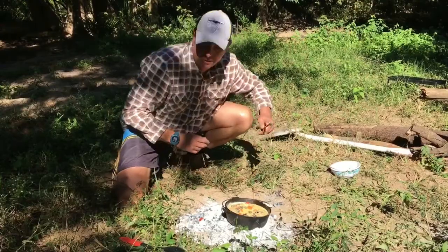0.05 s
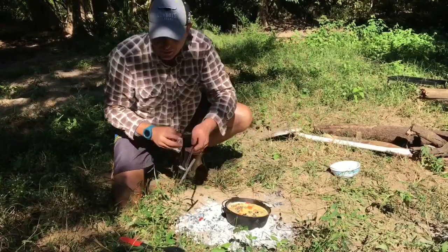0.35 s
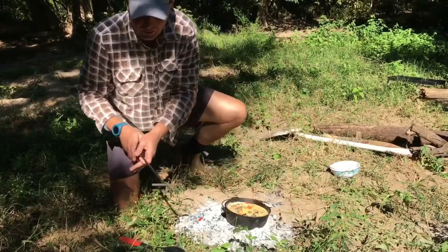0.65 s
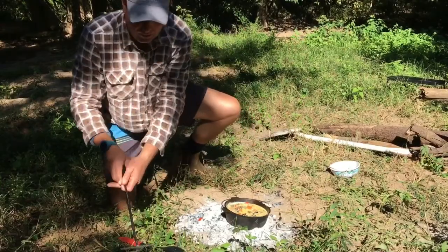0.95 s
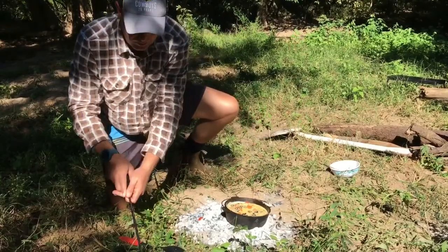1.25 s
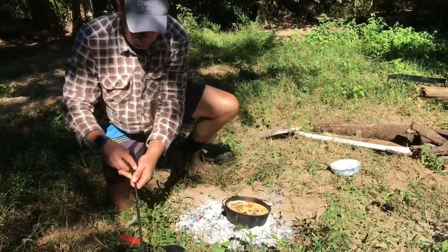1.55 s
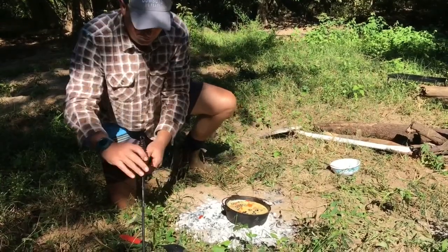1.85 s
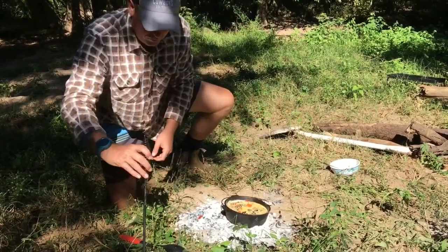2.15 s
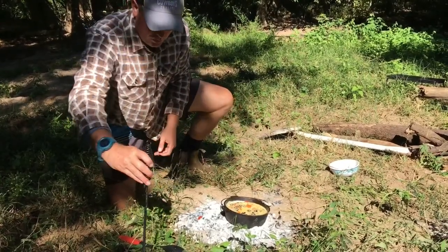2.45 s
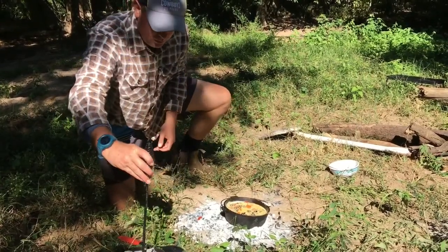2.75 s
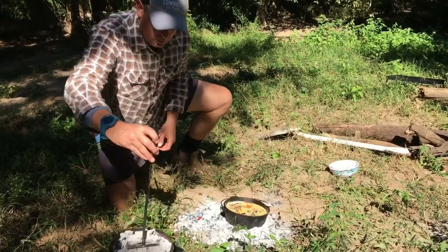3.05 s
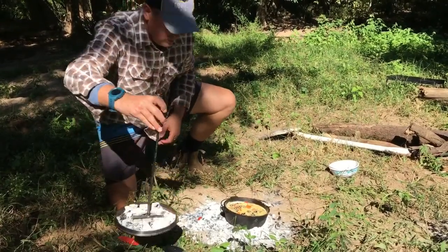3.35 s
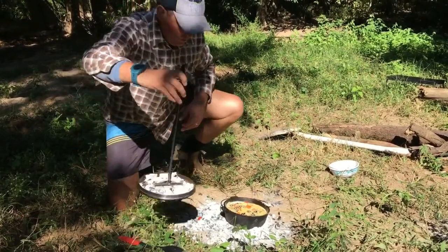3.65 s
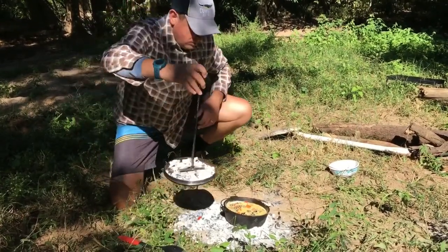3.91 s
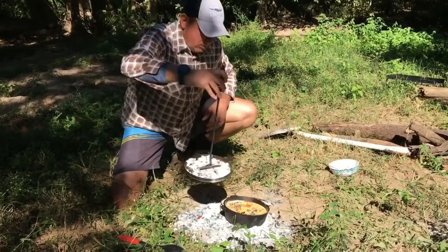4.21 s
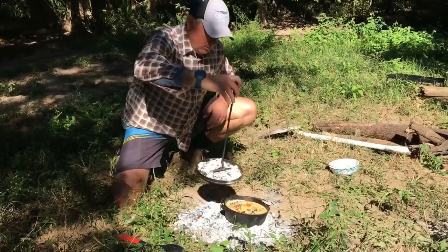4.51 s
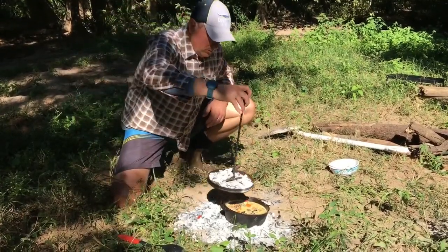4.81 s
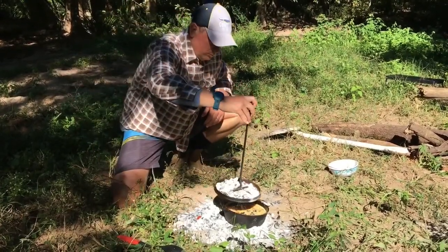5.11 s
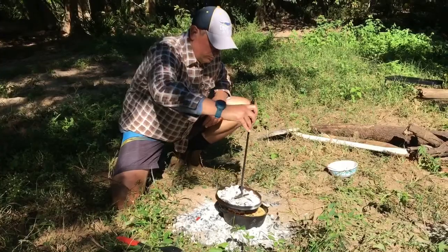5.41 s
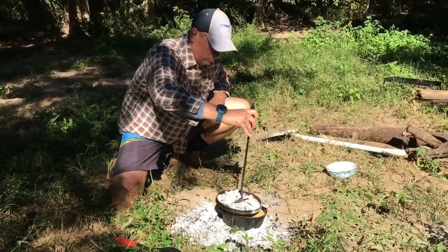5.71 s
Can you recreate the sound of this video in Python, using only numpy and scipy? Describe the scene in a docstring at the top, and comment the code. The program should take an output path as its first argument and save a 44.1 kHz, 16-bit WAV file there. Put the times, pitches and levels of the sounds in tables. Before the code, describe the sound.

Outdoors beside a bed of coals, a steel lid lifter clinks lightly a few times as it feels for the handle of an iron camp oven lid. It seats with one loud, short clank, followed by a small clink. After that come only faint dry ticks from the embers and hook, and one light tap. A steady hiss and a faint low rumble run underneath, with almost no echo.

```python
"""Outdoors beside a bed of coals, a steel lid lifter is hooked into the iron lid of a camp oven.
The rod clinks as it feels for the handle, then seats with one loud clank. Each impact excites the
damped normal modes of rod, lid and prongs, and the hook rebounds with less energy each time.
Embers and light touches of hook and rod tick in brief bursts; ground and trees scatter a thin tail.
Beneath them lie a steady hiss, a wavering rumble, a faint hum and a few soft low bumps."""
import sys
import numpy as np
from scipy import signal
from scipy.fft import irfft
from scipy.io import wavfile
from scipy.ndimage import uniform_filter1d

SR = 44100
rng = np.random.default_rng(int(sys.argv[2]) if len(sys.argv) > 2 else 0)


def to_wav(s):
    """Save 16-bit WAV."""
    ch = np.atleast_2d(s).T  # columns
    pcm = np.round(np.clip(ch, -1, 1) * 32767)  # PCM
    wavfile.write(sys.argv[1], SR, pcm.astype(np.int16))


N = 258835

# spectra of the outdoor hiss and rumble: (frequency [Hz], relative spectral density [dB])
HISS_SPECTRUM = [(250, -41), (420, -6), (672, -0.5), (781, -2.5), (1270, -0.5), (2320, -5.5), (2620, -8),
                 (4590, -9.5), (4950, -14), (5590, -12), (7680, -18), (9210, -18), (10600, -24),
                 (12900, -23.5), (15600, -33.5)]
RUMBLE_SPECTRUM = [(35, -41.5), (60, -7), (70, -18), (113, -5.5), (205, 1), (296, -0.5), (363, -7.5),
                   (397, -10), (420, -33), (550, -40.5), (920, -120)]
# soft low bumps: (time [s], level [dB], pitch [Hz], duration [s])
LOW_BUMPS = [(.32, -46, 118, 0.063), (1.57, -45, 192, .05), (1.818, -46, 430, 0.038),
             (1.862, -44, 141, 0.1), (5.81, -48, 88, 0.064)]
# blows of the hook: (time [s], strength [dB], part struck, relative clack level [dB],
# spectral tilt [dB/octave], contact time [s])
HOOK_BLOWS = [(1.1341, -40, "rod", 4, 4, .0004), (1.136, -18, "rod", -17, 0, 0.00064),
              (1.2723, -30.5, "prongs", 4, -6.5, 0.00046), (1.3073, -49.5, "prongs", 11, 1.5, .002),
              (1.588, -49.5, "rod", 0, 4, .004), (1.631, -39, "rod", -5, 4.3, .0117),
              (1.8136, -30, "rod", -7, 3, 0.0026), (2.0134, -2, "lid", -16, -0.95, 0.0015),
              (2.0544, -44, "prongs", 5, 0.5, .002), (2.2352, -31, "prongs", -0.5, -1.5, 0.0025),
              (2.249, -35, "prongs", 0, -8, .001), (4.418, -44, "rod", -5, 1, .0003)]
# modes of the rod, the lid with its handle, and the hook's prongs when knocked sideways:
# (frequency [Hz], relative level [dB], T60 [s])
ROD_MODES = [(1553, 0, .052), (1675, -12, .035), (3598, -9, .042), (4432, -11, .042), (4657, -16, .055),
             (5141, -25, .07), (6000, -24, .045), (6928, -17, .055), (7785, -31, .05), (8315, -25, .06),
             (9860, -32, .07), (12240, -29, .07), (12585, -36, .07), (14860, -25.5, .05)]
LID_MODES = [(1978, -2, .034), (2050, 0, .036), (2197, -23, .2), (2340, -15, .025), (2670, -15, .04),
             (3090, -9, .062), (3420, -24, .03), (3897, -14, .074), (5180, -29, .04), (5458, -30, .05),
             (6718, -15, .056), (6917, -20, .062), (7073, -29, .05), (7795, -30, .06), (10712, -28, .05),
             (10830, -33, .025), (13310, -37, .1)]
PRONG_MODES = [(1690, 9, .04), (6935, -3, .05), (7956, -2, .06), (8530, -5, .05), (9555, -2, .06),
               (10917, 0, .065), (11918, -1, .07), (12672, -5, .08), (13183, -7, .06), (14130, -8, .08)]
# how a blow is shared out, by part struck: (rod [dB], lid [dB], prongs [dB])
BLOW_SHARES = {"rod": (0, -36, -38), "lid": (-9.5, 0, -32), "prongs": (0, -20, -9)}
# spectrum of the irons' many damped modes: (frequency [Hz], relative spectral density [dB])
CLACK_SPECTRUM = [(60, -40.5), (250, -27), (1300, -32), (1700, 4), (2700, -1.5), (4000, -13), (6000, -8.5),
                  (8000, -25), (11500, -18), (15500, -29.5)]
# clearest sharp little ticks, from embers and from the hook and rod lightly touching the lid:
# (time [s], level [dB], band centre [Hz])
SHARP_TICKS = [(1.1505, -39, 13500), (1.1594, -36, 8000), (2.3314, -41, 9000), (2.5751, -43.5, 12000),
               (2.8675, -40.5, 13000), (3.316, -43, 11000), (4.2648, -44, 13000), (4.418, -31.5, 4000),
               (4.4384, -38.5, 11000), (4.8026, -45, 14000), (5.0261, -43.5, 11000)]
# reverberation time of the clearing: (frequency [Hz], T60 [s])
CLEARING_T60 = [(300, .3), (2000, 0.18), (6000, 0.32), (15000, .18)]


def gain_of(db):
    """Amplitude ratio: tenfold for every 20 dB."""
    return 10 ** (np.asarray(db) / 20)


def curve_at(points, hz):
    """Linear interpolation on a logarithmic frequency axis."""
    known_hz, values = np.transpose(points)
    return np.interp(np.log(hz + 1), np.log(known_hz + 1), values)


def add(mix, start_s, sound):
    """Superposition: a sound sums into the mix from its onset."""
    part = mix[max(round(start_s * SR), 0):][:len(sound)]
    part += sound[:len(part)]


def decay(t, t60):
    """Exponential damping: the amplitude falls 60 dB in t60 seconds."""
    return np.exp(-np.log(1000) * t / t60)


def noise(spectrum_db, size):
    """Fourier synthesis: random phases under spectrum_db(hz) give noise of unit rms."""
    hz = np.fft.rfftfreq(size, 1 / SR) + 1
    phases = np.exp(2j * np.pi * rng.random(len(hz)))
    x = irfft(gain_of(spectrum_db(hz)) * phases, size)
    return x / np.sqrt(np.mean(x ** 2) + 1e-20)


def air(hiss_db=-45, rumble_db=-52, waver_db=1.0, waver_hz=11.5, hum_db=-63, hum_hz=44.6):
    """Stationary noise gives a hiss, amplitude-modulated noise a rumble, and a pure tone a hum."""
    hiss = gain_of(hiss_db) * noise(lambda hz: curve_at(HISS_SPECTRUM, hz), N)
    waver = noise(lambda hz: -10 * np.log10(1 + ((hz - 1) / waver_hz) ** 4), N)
    rumble = gain_of(rumble_db + waver_db * waver) * noise(lambda hz: curve_at(RUMBLE_SPECTRUM, hz), N)
    hum = gain_of(hum_db) * np.sin(2 * np.pi * hum_hz * np.arange(N) / SR)
    return hiss + rumble + hum


def bumps(pitch_sag=0.22):
    """Tone bursts with a downward glide, heard as soft low swells."""
    out = np.zeros(N)
    for start_s, db, hz, duration_s in LOW_BUMPS:
        progress = np.linspace(0, 1, int(duration_s * SR))
        glide_hz = hz * (1 + pitch_sag * (.5 - progress))
        swell = gain_of(db) * np.sin(np.pi * progress) ** 2
        add(out, start_s, swell * np.sin(2 * np.pi * np.cumsum(glide_hz) / SR))
    return out


def ring(modes, t, tilt_db):
    """Free vibration is a sum of damped normal modes; harder contact tilts it towards the treble."""
    hz, db, t60 = np.transpose(modes)[:, :, None]
    amplitude = gain_of(db + tilt_db * np.log2(hz / hz[0]))
    return (amplitude * decay(t, t60) * np.sin(2 * np.pi * hz * t)).sum(0)


def clack(t, tilt_db, contact_s):
    """Modal overlap: many damped modes merge into noise, which lasts longer with longer contact."""
    lowest_hz = ROD_MODES[0][0]
    t60 = 0.033 + 6 * contact_s

    def spectrum_db(hz):
        return curve_at(CLACK_SPECTRUM, hz) + tilt_db * np.log2(np.maximum(hz, lowest_hz))
    return noise(spectrum_db, len(t)) * decay(t, t60)


def rebounds(time_s, db, tilt_db, flight_s=.03152, loss_db=18.5):
    """Inelastic collision: a blow and two rebounds, each weaker and duller than the last."""
    for _ in range(3):
        yield time_s, db, tilt_db
        time_s += flight_s * np.cbrt(gain_of(db))  # a harder hit flies longer
        db -= loss_db
        tilt_db -= 1


def clinks(radiation_hz=1400):
    """Impact excitation: each blow rings rod, lid and prongs; such slim irons radiate little bass."""
    out, t = np.zeros(N), np.arange(SR // 3) / SR
    irons = (ROD_MODES, LID_MODES, PRONG_MODES)
    for start_s, strength_db, part, clack_db, bright_db, contact_s in HOOK_BLOWS:
        shares = gain_of(BLOW_SHARES[part])
        attack = 1 - np.exp(-t / contact_s)  # the ring builds while the irons touch
        for time_s, db, tilt_db in rebounds(start_s, strength_db, bright_db):
            metal = sum(share * ring(modes, t, tilt_db) for share, modes in zip(shares, irons))
            metal += gain_of(clack_db) * clack(t, tilt_db, contact_s)
            add(out, time_s, gain_of(db) * metal * attack)
    radiation = signal.butter(4, radiation_hz, "highpass", fs=SR, output="sos")
    return signal.sosfilt(radiation, out)


def ticks(snap_s=0.0012, half_width_octaves=0.7, faint_db=-57, spread_db=8, faint_count=36):
    """Brief transients are broadband: snapping embers and light touches of hook and rod tick dryly."""
    out, t = np.zeros(N), np.arange(SR // 50) / SR
    faint_ticks = [(when * N / SR, faint_db + spread_db * size, 9000 + 5000 * pitch)
                   for when, size, pitch in rng.random((faint_count, 3))]
    for start_s, db, centre_hz in list(SHARP_TICKS) + faint_ticks:
        def band_db(hz):
            return -10 * np.log10(1 + (np.log2(hz / centre_hz) / half_width_octaves) ** 4)
        add(out, start_s, gain_of(db) * noise(band_db, len(t)) * np.exp(-t / snap_s))
    return out


def clearing(x, wet_db=-27, build_s=0.016):
    """Diffuse scattering: ground and trees return a thin tail whose decay varies with frequency."""
    hz, t, spectra = signal.stft(rng.standard_normal(SR // 2), SR, nperseg=256)
    spectra *= decay(t, curve_at(CLEARING_T60, hz)[:, None]) * (1 - np.exp(-t / build_s))
    tail = signal.istft(spectra, SR)[1]
    return x + gain_of(wet_db) * signal.fftconvolve(x, tail / np.linalg.norm(tail))[:N]


def scene():
    """Superposition in one channel: clinks and ticks in the clearing, over the background."""
    return (clearing(clinks() + ticks()) + bumps() + air())[None]


def record(dry, limit_db=-1.0, recover_db_per_s=9, cutoff_hz=15800):
    """Peak limiting holds the clank and lets the hiss back slowly; a low-pass bounds the treble."""
    excess_db = np.maximum(20 * np.log10(abs(dry[0]) + 1e-9) - limit_db, 0)
    recovery_db = np.arange(N) * recover_db_per_s / SR
    held_db = np.maximum.accumulate(excess_db + recovery_db) - recovery_db
    reduction_db = uniform_filter1d(held_db, size=64)
    lowpass = signal.firwin(1023, cutoff_hz, window=("kaiser", 9), fs=SR)
    return signal.oaconvolve(dry * gain_of(-reduction_db), lowpass[None], "same")


dry = scene()
out = record(dry)
to_wav(out)
```